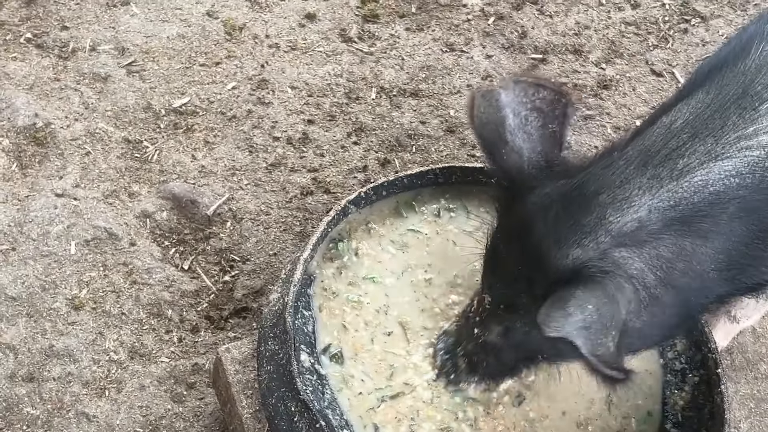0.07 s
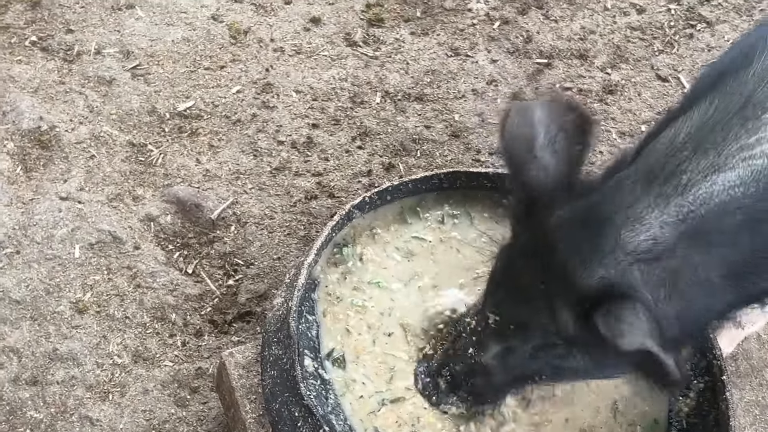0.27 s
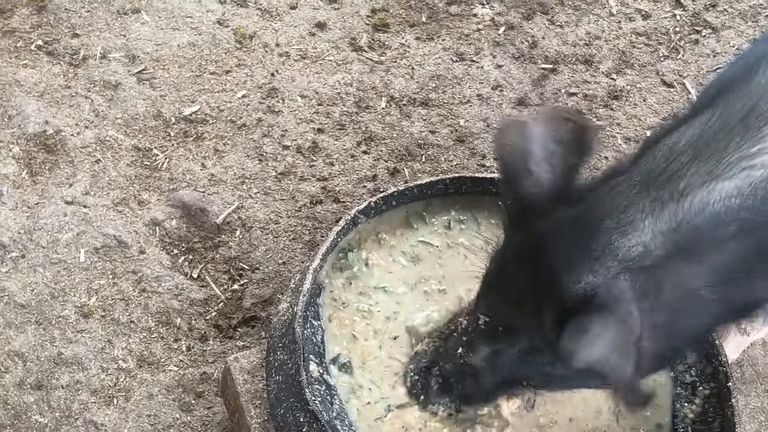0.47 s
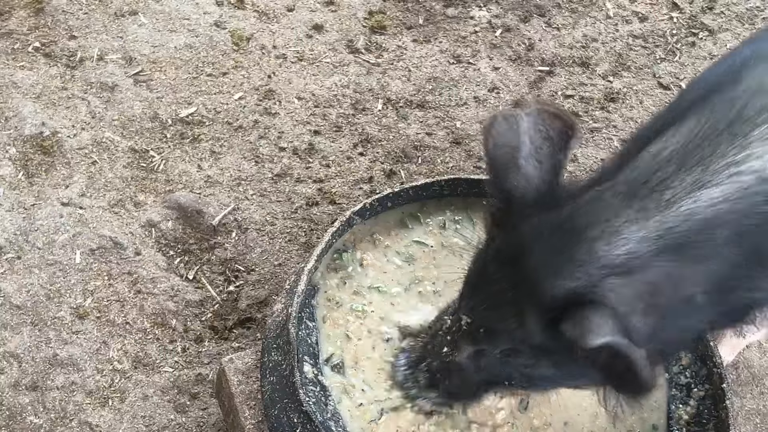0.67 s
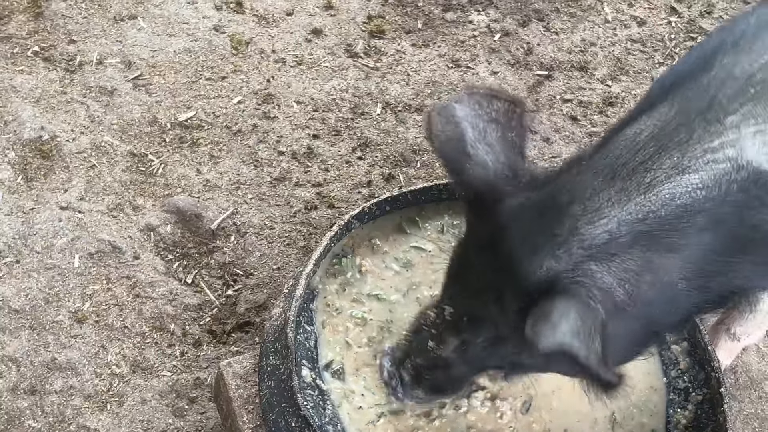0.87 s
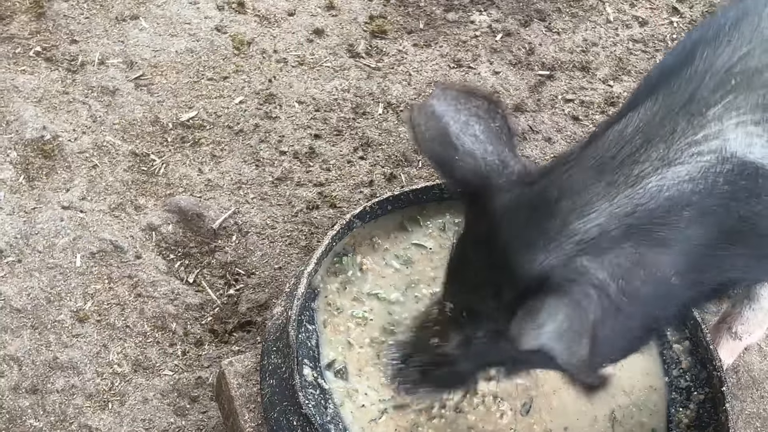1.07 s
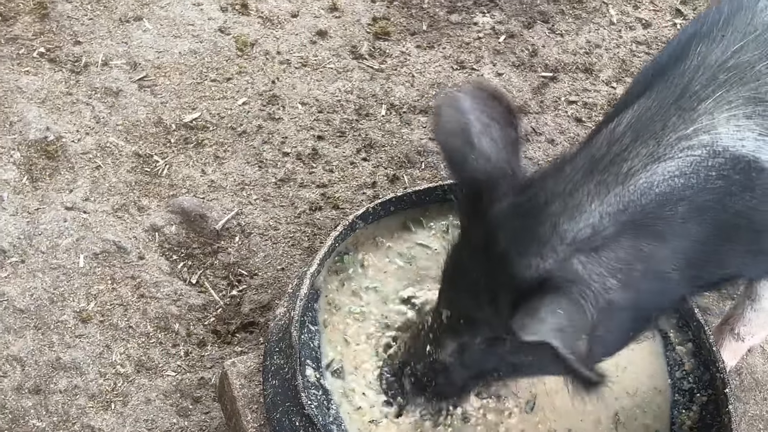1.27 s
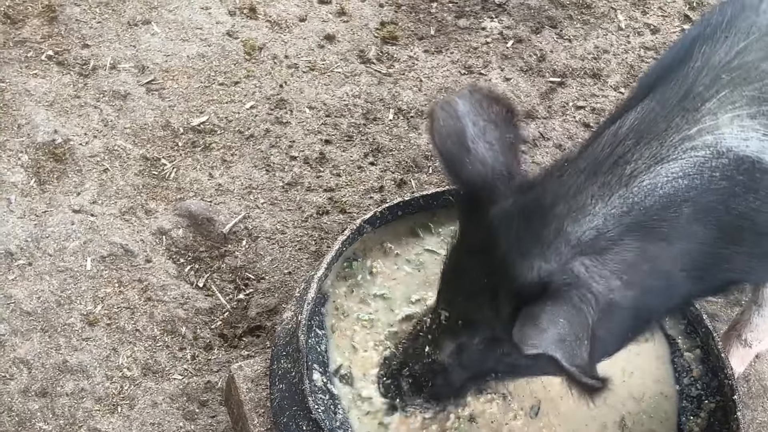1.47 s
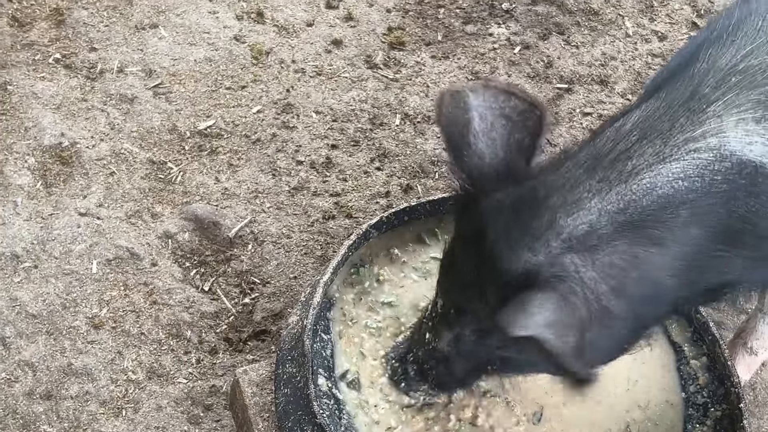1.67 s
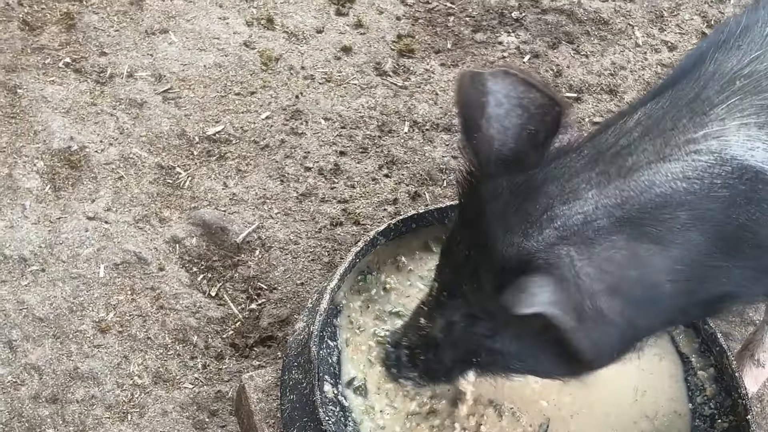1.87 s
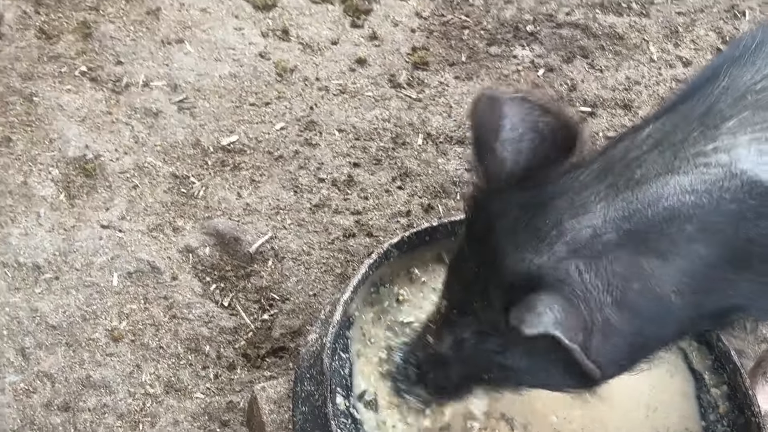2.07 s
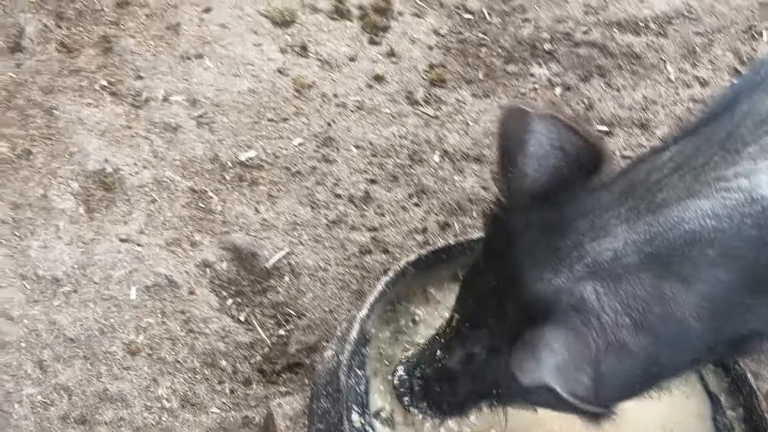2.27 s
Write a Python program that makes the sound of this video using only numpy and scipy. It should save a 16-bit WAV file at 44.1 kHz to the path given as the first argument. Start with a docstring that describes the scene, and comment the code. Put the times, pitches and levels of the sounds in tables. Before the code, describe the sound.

A pig eats wet mash up close, with quick smacks, squelches and pops.

```python
"""Wet smacks and squelches, close up: a pig eats mash from a bowl outdoors, about four bites a second.
Each bite is a swarm of tiny bubbles, a sharp smack as the lips part and a few air pockets that pop.
Softer chewing, wet ticks and dull bumps fill the gaps; bowl and ground throw back short echoes.
Behind the pig, an insect rasps in high, even phrases over the quiet air of the yard."""
import sys
import numpy as np
from scipy import signal
from scipy.fft import rfft, irfft, next_fast_len
from scipy.io import wavfile
from scipy.ndimage import uniform_filter1d

SR = 44100
rng = np.random.default_rng(int(sys.argv[2]) if len(sys.argv) > 2 else 0)


def store_wav(level_fs):
    """Save 16-bit WAV to argv[1]."""
    pcm = np.round(np.clip(np.atleast_2d(level_fs), -1, 1) * 32767)
    wavfile.write(sys.argv[1], SR, pcm.T.astype(np.int16))


N = 103635
T = np.arange(N) / SR


def amp(db):
    """Decibels to gain."""
    return 10 ** (np.asarray(db) / 20)


def unit_rms(x):
    """Scales a signal to rms 1."""
    return x / np.sqrt(np.mean(x ** 2) + 1e-20)


def curve_db(points, hz):
    """The level of an EQ curve at hz, along a log frequency axis."""
    point_hz, point_db = np.transpose(points)
    return np.interp(np.log(hz + 1), np.log(point_hz + 1), point_db)


def add(mix, start_s, sound):
    """Mixes a sound in at start_s, trimming whatever overhangs."""
    at = round(start_s * SR)
    part = mix[max(at, 0):max(at + len(sound), 0)]
    part += sound[max(-at, 0):][:len(part)]


def band_noise(hz, width_hz):
    """Noise of rms 1 around a steady or moving pitch."""
    f = np.fft.fftfreq(next_fast_len(len(hz)), 1 / SR)
    white = rng.standard_normal(len(f)) + 1j * rng.standard_normal(len(f))
    slow = np.fft.ifft(np.fft.fft(white) / (1 + 2 * (f / width_hz) ** 2) ** 2)
    carrier = np.exp(2j * np.pi * np.cumsum(hz) / SR)
    return unit_rms((slow[:len(hz)] * carrier).real)


def swell(u, steepness=1.27):
    """An envelope that rises to 1 at u = 1, then dies away."""
    return (u * np.exp(1 - u)) ** steepness


def bubble(hz, swell_s, glide=0.024):
    """An air pocket opens and rings for a few cycles, its pitch sliding up a little."""
    u = np.arange(int(8 * swell_s * SR) + 2) / SR / swell_s
    pitch = hz * (1 + glide * (u - 1))
    return swell(u) * np.sin(2 * np.pi * np.cumsum(pitch) / SR)


def yard(level_db=-49.5, patch_db=4):
    """Quiet open air: drifting patches of hiss over a steady bass."""
    # The tone of the air. Each row: frequency in Hz, relative level in dB.
    air_curve = [(40, -27), (55, -27), (75, 8), (110, 2.5), (200, 3), (400, 0), (900, 0.5), (2000, -0.5),
                 (4000, -5.5), (9000, -11.5), (13000, -14.5)]
    hz = np.fft.rfftfreq(2048, 1 / SR)
    real, imag, patches = rng.standard_normal((3, N // 512 + 5, len(hz)))
    patches = uniform_filter1d(patches, size=6, axis=0, mode="wrap")  # smooth in time
    patches = unit_rms(uniform_filter1d(patches, size=24, axis=1, mode="wrap"))  # and in frequency
    depth = hz / (hz + 400)
    spectra = (real + 1j * imag) * amp(curve_db(air_curve, hz) + patch_db * depth * patches)
    air = signal.istft(spectra.T, nperseg=2048, noverlap=1536)[1][:N]
    return amp(level_db) * unit_rms(air)


def insect(level_db=-53, rise_db=1, skirt_db=-5.5):
    """A narrow, fast-pulsing rasp over a weaker skirt; each phrase climbs in pitch, then eases off."""
    # Phrases of equal length. Each entry: start in seconds.
    phrase_starts = [-.16, .063, .278, .484, .7, .912, 1.197, 1.418, 1.65, 1.884, 2.124]
    phrase_s, fade_s = 0.205, 0.038
    top_hz, climb_hz, width_hz = 11420, 384.6, 520
    pulse_hz, pulse_depth = 222, 0.6
    out, t = np.zeros(N), T[:SR // 4]
    progress = np.minimum(t / phrase_s, 1)
    hz = top_hz - climb_hz * (progress / 0.65 - 1) ** 2  # highest 65% of the way through
    fade = np.clip(np.minimum(t, phrase_s - t) / fade_s, 0, 1)
    envelope = fade * amp(level_db + rise_db * (progress - 0.5))
    strokes = 1 + pulse_depth * np.cos(2 * np.pi * pulse_hz * t)
    for start_s in phrase_starts:
        rasp = band_noise(hz, width_hz)
        skirt = amp(skirt_db) * band_noise(hz - width_hz / 2, 2 * width_hz)
        add(out, start_s, envelope * strokes * (rasp + skirt))
    return out


def bumps():
    """Dull low bumps as the pig shifts at the bowl."""
    # Soft thuds. Each row: middle in seconds, half length in seconds, pitch in Hz, level in dB.
    thuds = [(0.738, 0.015, 186.3, -50), (1.929, 0.0031, 170, -47), (1.97, 0.048, 104.8, -53.5)]
    out = np.zeros(N)
    for middle_s, half_s, hz, db in thuds:
        envelope = amp(db) * np.exp(-((T - middle_s) / half_s) ** 2 / 2)
        out += envelope * band_noise(np.full(N, hz), width_hz=160)
    return out


def squelches(pitch_count=64, size_spread_db=3.5, smear_s=0.0056, chew_swing_db=2.3, chew_hz=19):
    """Swarms of small bubbles swell with each bite; a softer, blurred swarm goes on in between."""
    # Mash squeezed through the mouth. Each row: middle in seconds, half length in seconds,
    # then the levels of gurgle, crackle and fizz in dB.
    squeezes = [(0.248, 0.012, -38, -42.5, -38), (0.303, 0.05, -58, -46.5, -54),
                (0.392, 0.026, -59, -44, -48), (0.432, 0.0051, -60, -41, -33.5),
                (0.454, 0.0038, -54, -29, -46), (0.627, 0.0048, -67, -35.5, -45),
                (0.678, 0.0039, -62, -34, -46), (0.912, .012, -44, -50, -41.5),
                (0.946, 0.018, -47, -46.5, -60), (1.102, 0.0073, -52, -50, -50),
                (1.146, 0.0097, -42, -40.5, -38.5), (1.301, 0.009, -50, -40, -49.5),
                (1.36, 0.013, -56, -39.5, -38), (1.609, 0.0087, -42, -44, -53),
                (1.741, 0.024, -71, -46, -52), (1.804, 0.017, -37.5, -44, -44),
                (1.984, 0.0088, -58, -58, -44.5), (2.032, 0.011, -44.5, -40.5, -39.5),
                (2.06, 0.0056, -41, -34, -38.5)]
    # Three sizes of bubble: gurgle, crackle, fizz. Each row: lowest and highest pitch in Hz,
    # bubbles per second, swell time in cycles, level between bites in dB.
    bubble_bands = [(358, 1113, 900, 0.77, -58), (1237, 4720, 1300, 1.73, -57),
                    (5130, 13360, 2200, 2.2, -56.5)]
    out, t = np.zeros(N), T[:2048]
    for band, (low_hz, high_hz, rate, cycles, rest_db) in enumerate(bubble_bands):
        sizes = amp(size_spread_db * np.minimum(rng.exponential(1, N), 3))
        onsets = np.flatnonzero(rng.random(N) < rate / SR)
        steps = (np.arange(pitch_count) + rng.random(pitch_count)) / pitch_count
        pitches = low_hz * (high_hz / low_hz) ** steps
        rings = [bubble(hz, cycles / hz) * np.sqrt(hz) for hz in pitches]  # equal energy
        choice = rng.integers(0, pitch_count, N)
        swarm = np.zeros(N)
        for at in onsets:
            add(swarm, at / SR, sizes[at] * rings[choice[at]])
        swarm = unit_rms(swarm)
        scatter = rng.choice([-1, 1], len(t)) * np.exp(-t / smear_s)
        blurred = unit_rms(signal.oaconvolve(swarm, scatter)[:N])
        wander = np.interp(T, np.arange(192) / (2 * chew_hz), rng.standard_normal(192))
        chew_gain = amp(rest_db + chew_swing_db * np.clip(wander, -2, 2))
        bite_power = sum(amp(levels[band]) ** 2 * np.exp(-((T - middle_s) / half_s) ** 2)
                         for middle_s, half_s, *levels in squeezes)
        out += swarm * np.sqrt(bite_power) + unit_rms(blurred + 0.5 * swarm) * chew_gain
    return out


def ticks(followers=5, ring_cycles=6, spread_s=0.0071, spread_octaves=0.7):
    """A bubble bursts with a sharp edge; weaker ones of scattered pitch follow within milliseconds."""
    # Wet ticks of chewing. Each row: start in seconds, pitch in Hz, peak level in dB.
    bursts = [(0.1731, 1950, -32.5), (0.526, 3750, -33), (.578, 4000, -31), (0.8585, 3180, -24.5),
              (1.305, 2210, -31.5), (1.475, 2050, -36), (1.559, 3060, -31.5), (1.6617, 2620, -27),
              (1.665, 3960, -26), (1.7488, 2010, -28.5), (1.843, 2390, -36), (1.892, 3070, -38.5),
              (1.965, 3230, -31), (1.975, 3090, -25.5), (1.995, 3170, -31), (2.178, 2120, -35)]
    out, t = np.zeros(N), T[:1024]
    ring = lambda hz: np.sin(2 * np.pi * hz * t) * np.exp(-hz * t / ring_cycles)
    for start_s, hz, db in bursts:
        add(out, start_s, amp(db) * ring(hz))
        for late, detune in rng.random((followers, 2)):
            follower = ring(hz * 2 ** (spread_octaves * (2 * detune - 1)))
            drop_db = 9.5 * (0.5 + late)
            add(out, start_s + spread_s * late, amp(db - drop_db) * follower)
    return out


def pops():
    """Single large air pockets pop in mouth and mash, each with a little wet spatter."""
    # Air pockets. Each row: start in seconds, pitch in Hz, peak level in dB, swell time in ms.
    pockets = [(.2348, 817, -37, 1.3), (.2485, 690, -28.5, 2.2), (0.2494, 4600, -33.5, 2.3),
               (0.2608, 7530, -27, 2), (0.3694, 850, -28.5, 0.75), (0.3943, 1357, -32, 2.5),
               (0.3939, 4240, -28, 1.7), (.4345, 516, -19, 1.36), (.4450, 790, -25, 1.6),
               (0.45, 1362, -34.5, 1.8), (0.5923, 920, -28, 1.04), (.6372, 845, -15.5, 0.57),
               (0.6405, 478, -20.5, 1.05), (.6460, 595, -17, 2.3), (0.6448, 3960, -20.5, 1.9),
               (0.6517, 2040, -11, 1.63), (0.651, 5400, -17, 0.9), (0.9013, 1640, -32.5, 1.35),
               (.9100, 624, -32.5, 2.25), (.925, 630, -32, 1.04), (1.1435, 4200, -19, 1.16),
               (1.1455, 7760, -27, 0.58), (1.1462, 720, -25.5, 0.48), (1.3658, 685, -26.5, 1.5),
               (1.3655, 4820, -22, 0.6), (1.3728, 3900, -19, 0.9), (1.5695, 527, -16, 1.35),
               (1.6048, 3500, -26.5, 0.92), (1.665, 7900, -30, 0.55), (1.7795, 867, -34, 1.1),
               (1.8018, 660, -27, 1.2), (1.816, 393, -29, 1.6), (1.826, 410, -44, 2.4),
               (1.9845, 910, -31, 0.64), (2.0172, 1830, -33.5, 1.1), (2.0345, 544, -27.5, 0.95),
               (2.0602, 6300, -27, 1.1), (2.1950, 880, -37.5, 1.45)]
    out, t = np.zeros(N), T[:2048]
    for start_s, hz, db, swell_ms in pockets:
        swell_s = swell_ms / 1000
        spatter = swell(t / (2.53 * swell_s)) * band_noise(np.full(len(t), hz), width_hz=0.53 * hz)
        spatter_db = -28 + 0.43 * db  # falls less than the pop does, so small pops are rougher
        add(out, start_s, amp(db) * bubble(hz, swell_s))
        add(out, start_s, amp(spatter_db) * spatter)
    return out


def smacks(grain=0.33, resonance_db=4):
    """A wet film tears in a dense burst of tiny clicks, coloured by the shape of the mouth."""
    # Lips and tongue snapping apart. Each row: start in seconds, level in dB, swell time in ms,
    # brightness in dB per octave.
    snaps = [(0.1705, -39, 3, 2), (0.196, -37.5, 1.9, 12), (0.2385, -30.5, 2.6, 1),
             (0.392, -29.5, 1.1, -6.5), (0.4334, -23.5, 0.78, -5.5), (0.6357, -17.5, 1.1, -0.5),
             (0.64, -20.5, .7, -2), (0.645, -25, 2.6, 2.5), (0.845, -34, 0.87, 13), (0.891, -37.5, 2.3, 7),
             (0.9006, -33, 2.7, 4), (0.939, -31.5, 0.95, 1), (1.0714, -39.5, 2.7, 1), (1.112, -32, 0.49, 3),
             (1.1447, -19.5, 1.2, 3.5), (1.3656, -24.5, 0.65, 14), (1.3714, -22, 1.2, 4.5),
             (1.5689, -20.5, 1.26, -0.5), (1.6645, -34, 1.2, 1.5), (1.7547, -35, 1.8, 4),
             (1.7814, -28, 1.46, 0), (2.0278, -21.5, 0.5, 32), (2.0600, -26, 0.69, 5),
             (2.331, -37.5, 2.4, 1)]
    # The tone of the mouth. Each row: frequency in Hz, relative level in dB.
    mouth_curve = [(100, -31), (300, -12.5), (800, 7), (1500, -1.5), (2800, 3.5), (4300, 3.5), (7500, 0),
                   (11000, -2), (16000, -5)]
    out, t = np.zeros(N), T[:2048]
    hz = np.fft.rfftfreq(len(t), 1 / SR)
    octaves = np.log2(np.clip(hz, 300, 9000))
    hardest_db = max(row[1] for row in snaps)
    for start_s, db, swell_ms, tilt in snaps:
        noise, sizes, ripple = rng.standard_normal((3, len(t)))
        clicks = noise * np.exp(grain * sizes)
        ripple_db = resonance_db * unit_rms(uniform_filter1d(ripple[:len(hz)], size=40))
        dull_db = 0.3 * (hardest_db - db) * np.maximum(hz / 4500 - 2, 0)  # soft smacks lose top treble
        colour = amp(curve_db(mouth_curve, hz) + ripple_db - dull_db + tilt * octaves)
        envelope = swell(t * 1000 / swell_ms)
        burst = envelope * irfft(rfft(clicks) * colour)
        add(out, start_s, amp(db) * burst * np.linalg.norm(envelope) / np.linalg.norm(burst))
    return out


def pen(sound, tail_db=-9, t60_s=0.085, fade_in_s=0.00043):
    """The pen adds a few close echoes and a short scattered tail."""
    # Echoes from bowl and ground. Each row: delay in seconds, linear gain.
    echoes = [(.0031, 0.091), (.0083, 0.071), (0.0119, .10)]
    t = T[:SR // 3]
    tail = rng.standard_normal(len(t)) * amp(-60 * t / t60_s) * np.minimum(t / fade_in_s, 1)
    response = amp(tail_db) * tail / np.linalg.norm(tail)
    for delay_s, gain in echoes:
        add(response, delay_s, np.array([gain]))
    return sound + signal.fftconvolve(sound, response)[:N]


def scene():
    """The pig in its pen, the insect and the yard, in mono."""
    eating = pops() + ticks() + smacks() + squelches()
    return (pen(eating) + bumps() + insect() + yard())[None]


def record(dry, low_cut_hz=55, top_hz=16000):
    """The microphone's low cut, then the band limit."""
    low_cut = signal.butter(4, low_cut_hz, "high", fs=SR, output="sos")
    band_limit = signal.firwin(511, top_hz, window=("kaiser", 9), fs=SR)
    return signal.oaconvolve(signal.sosfilt(low_cut, dry), band_limit[None], "same")


dry = scene()
out = record(dry)
store_wav(out)
```